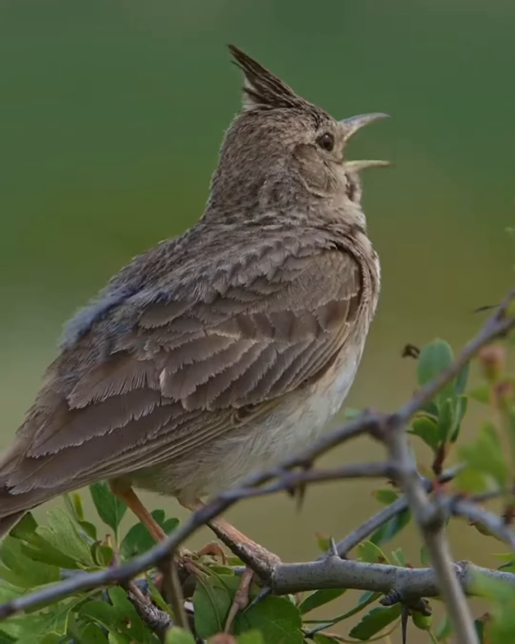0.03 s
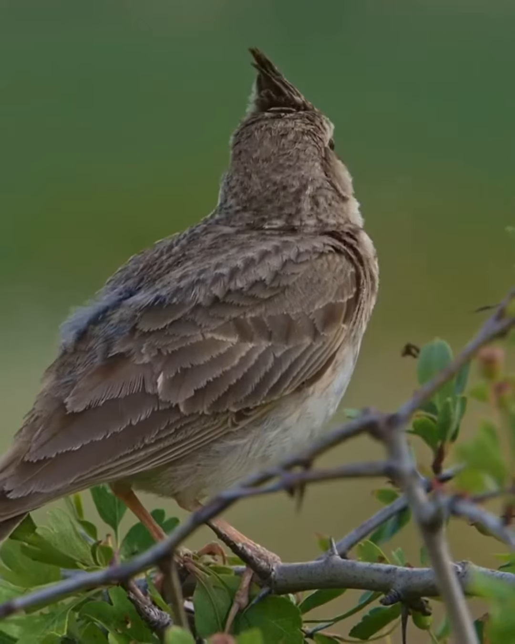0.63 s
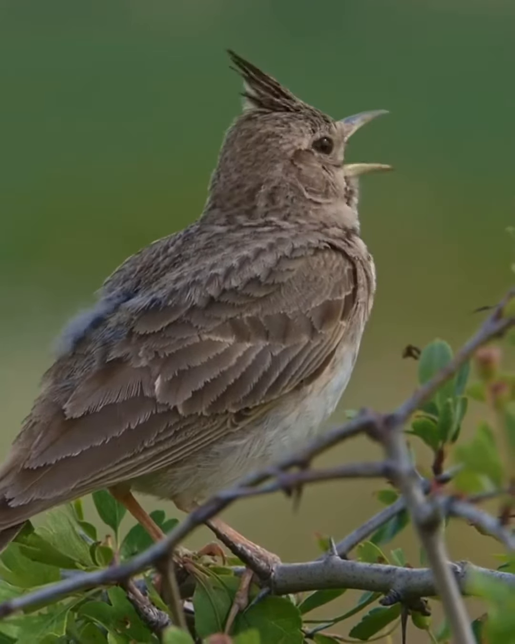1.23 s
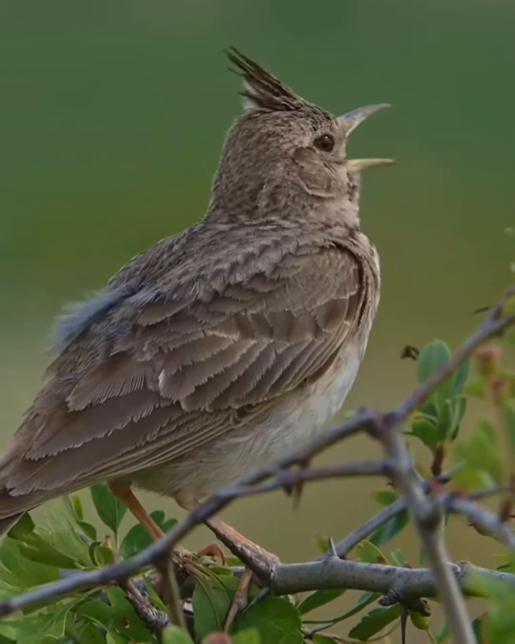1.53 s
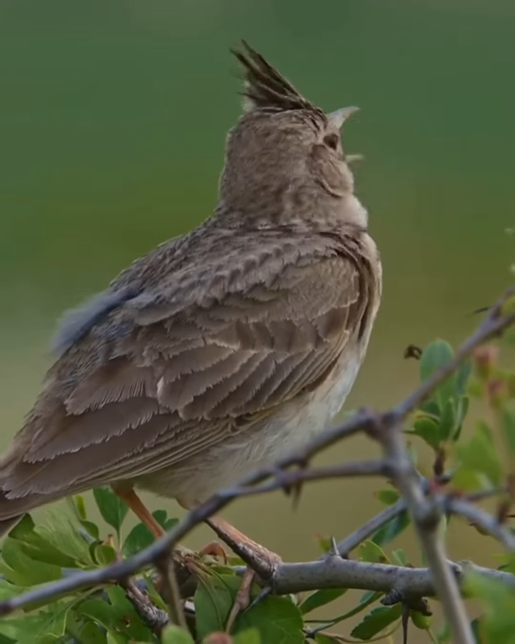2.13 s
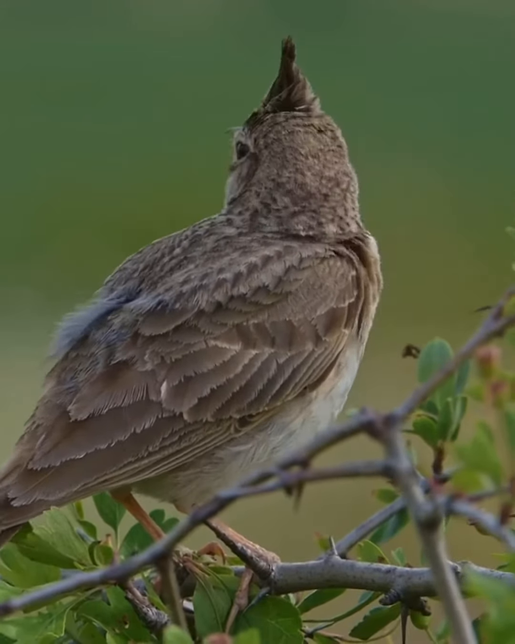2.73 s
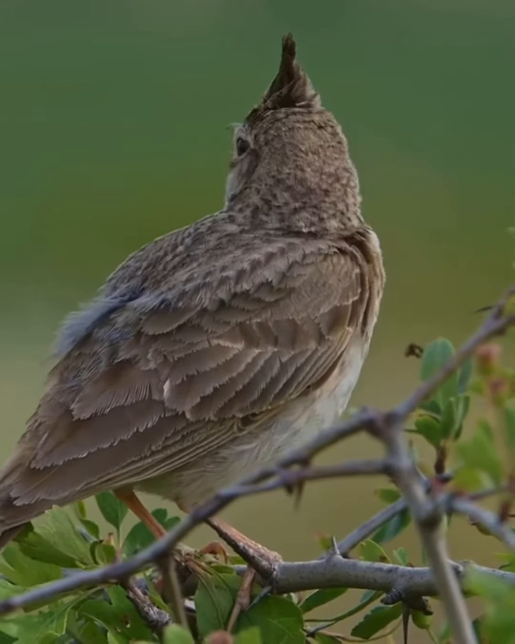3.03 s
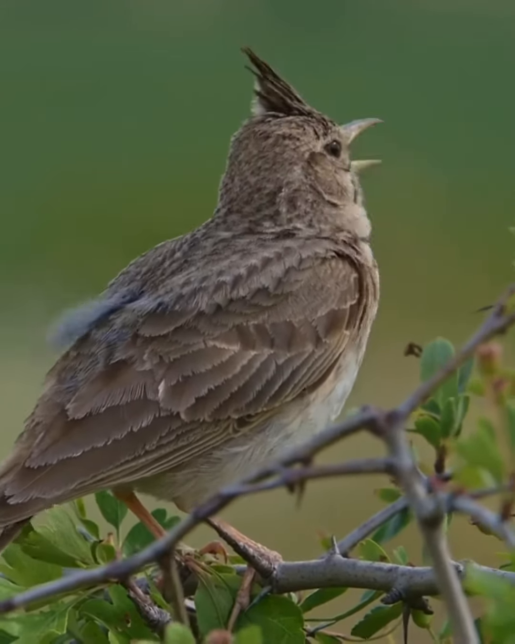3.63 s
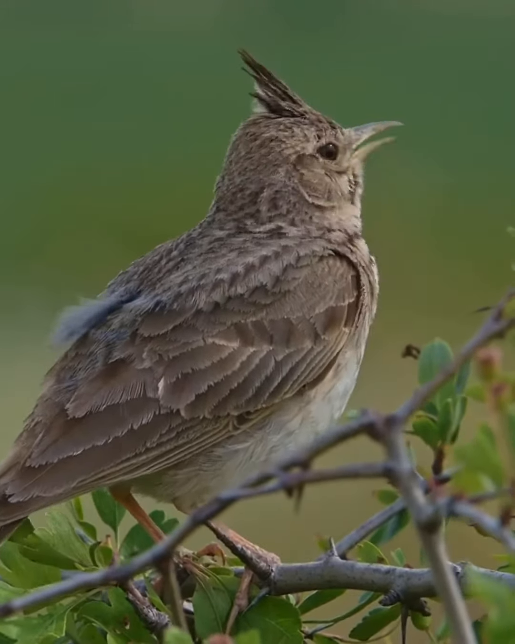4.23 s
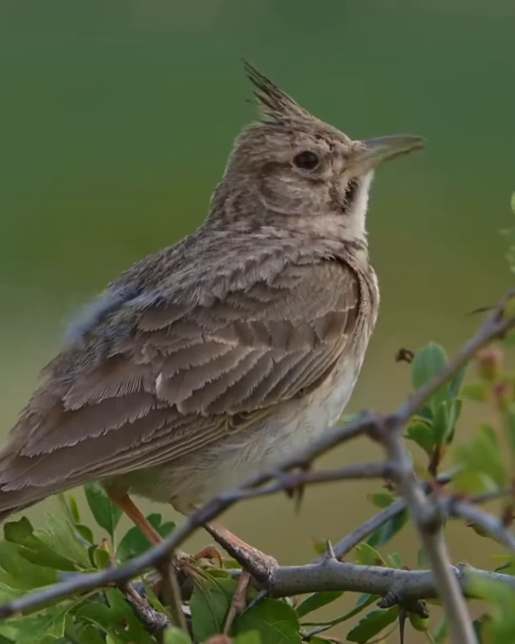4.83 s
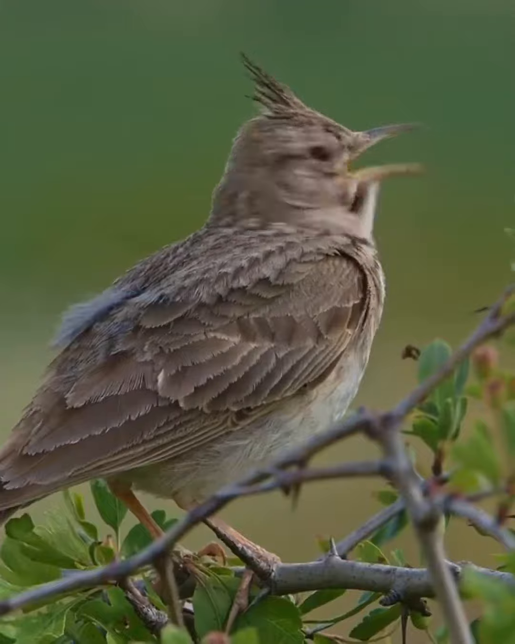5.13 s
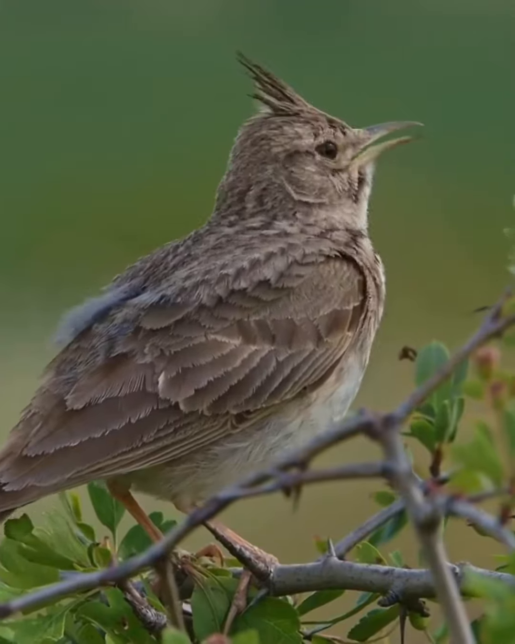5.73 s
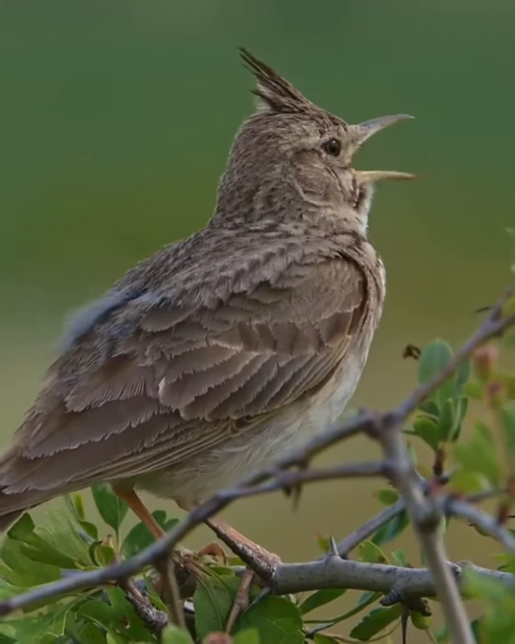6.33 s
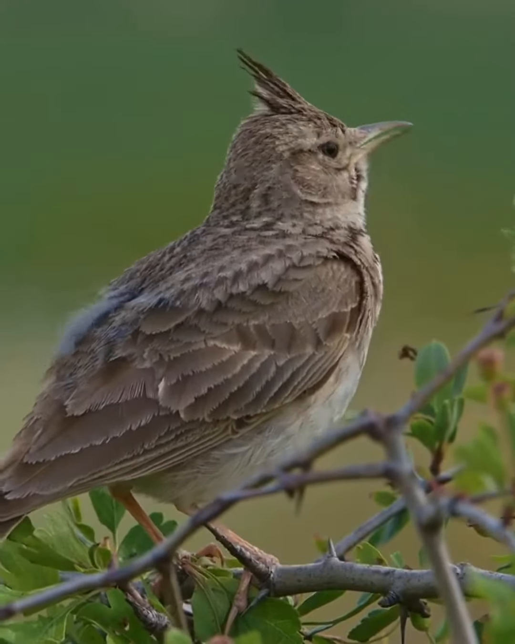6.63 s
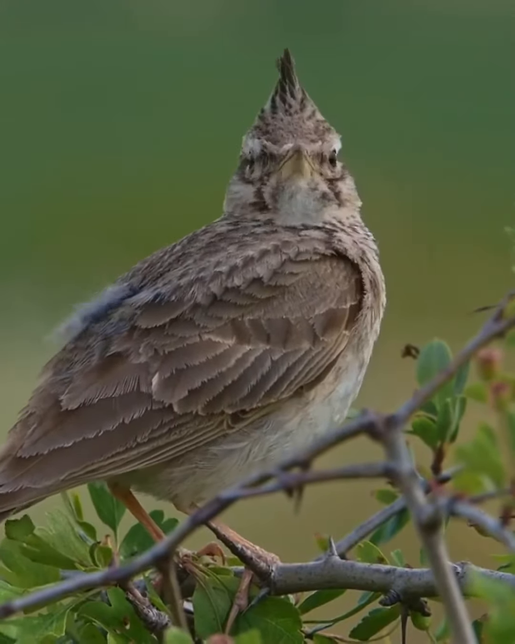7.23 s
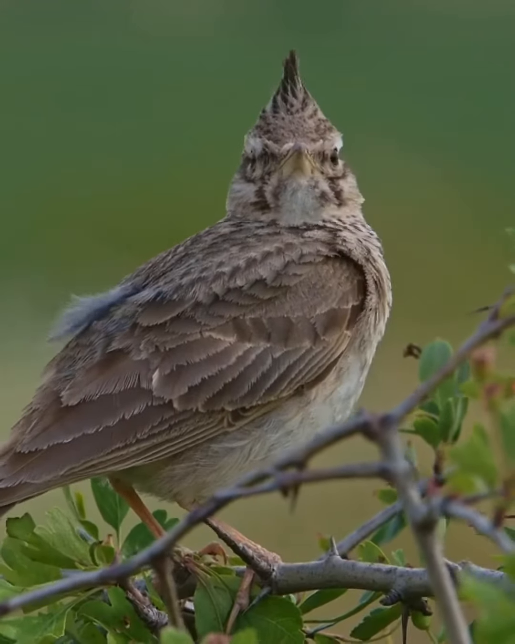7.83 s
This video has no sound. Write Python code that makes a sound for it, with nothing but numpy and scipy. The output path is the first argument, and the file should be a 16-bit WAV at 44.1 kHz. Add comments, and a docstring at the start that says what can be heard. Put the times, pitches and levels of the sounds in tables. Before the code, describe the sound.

In quiet open country, a small bird close to the microphone pours out bursts of bright, fast twittering, with swooping whistles, flutters and brief raspy notes. A fainter bird buzzes and trills in the gaps. After about seven seconds the near song ends, leaving the far bird's four descending slurs and a few tiny pips. The bushes add only a very short echo over a faint hush.

```python
"""A crested lark sings from a thorn bush in open scrub, close to a stereo microphone.
Its syrinx whistles fast slurs and zigzags, flutters into purrs and slaps shut in nasal notes
and dry rasps; air hisses through the beak. Twigs and bushes scatter the song into a short tail.
Farther off another bird answers with soft falling trills and pips; the air is almost still."""
import sys
import numpy as np
from scipy import signal
from scipy.fft import rfft, irfft
from scipy.io import wavfile
from scipy.ndimage import uniform_filter1d

SR = 44100
rng = np.random.default_rng(int(sys.argv[2]) if len(sys.argv) > 2 else 0)


def output_pcm(signal):
    """Save a mono or channel-first signal as 16-bit PCM at the path in sys.argv[1].

    Samples are clipped to [-1, 1] before scaling.
    """
    pcm = np.clip(np.atleast_2d(signal).T, -1, 1) * 32767
    wavfile.write(sys.argv[1], SR, np.round(pcm).astype(np.int16))


N = 356769


def from_db(db):
    return 10 ** (np.asarray(db) / 20)


def unit_rms(x):
    return x / np.sqrt(np.mean(x ** 2) + 1e-20)


def at_hz(points, hz):
    """Read a curve of (frequency, value) points along a log frequency axis."""
    known_hz, values = np.transpose(points)
    return np.interp(np.log(hz + 1e-9), np.log(known_hz), values)


def wander(size, per_s):
    """Smooth random motion of rms 1, with changes up to about per_s times a second."""
    lowpass = signal.butter(3, per_s, fs=SR, output="sos")
    return unit_rms(signal.sosfilt(lowpass, rng.standard_normal(size + 4000))[4000:])


def coloured_noise(spectrum):
    """Noise of rms 1 with the given spectral shape."""
    gains = from_db(at_hz(spectrum, np.fft.rfftfreq(N, 1 / SR)))
    return unit_rms(irfft(rfft(rng.standard_normal(N)) * gains, N))


def add(out, start_s, sound):
    """Mix a stereo sound in at its time."""
    first = max(round(start_s * SR), 0)
    part = sound[:, :max(N - first, 0)]
    out[:, first:first + part.shape[1]] += part


def fade(size, edge_s):
    """The bird's air valve opens and closes softly."""
    t = np.arange(size) / SR
    return np.sin(np.pi / 2 * np.clip(np.minimum(t, t[::-1]) / edge_s, 0, 1)) ** 2


def gesture(rows, glide_s=.0025, edge_s=.006):
    """Start, pitch and amplitude of a syllable; muscle inertia rounds the corners."""
    times, hz, db = np.transpose(sorted(map(tuple, rows)))
    t = np.arange(times[0] - edge_s / 2, times[-1] + edge_s / 2, 1 / SR)
    width = max(int(glide_s * SR), 3)
    inertia = signal.windows.hann(width)

    def rounded(values):
        padded = np.pad(np.interp(t, times, values), width, "edge")
        return signal.convolve(padded, inertia / inertia.sum(), "same")[width:-width]

    return t[0], rounded(hz), from_db(rounded(db)) * fade(len(t), edge_s)


# Where each pitch sits at the microphone: (frequency [Hz], left minus right [dB])
BALANCE = [(1300, 4.5), (2000, 2), (2550, -1.5), (2850, -6), (3100, -1.5), (3400, -5.5), (3680, 0),
           (3920, -4), (4130, 6.5), (4260, 3), (4400, 1), (4650, -2.5), (5200, -1.5), (5900, 3), (7000, 0),
           (10400, 10), (12500, -1.5), (14000, -7.5)]


def stereo_gains(hz):
    """Left and right gain at each frequency."""
    lean_db = at_hz(BALANCE, hz) / 2
    return from_db([lean_db, -lean_db])


def partial(hz, right_leads_s=1.3e-5):
    """A stereo sine that follows a pitch curve."""
    cycles = np.cumsum(hz) / SR + np.outer([0, right_leads_s], hz)
    return np.sqrt(2) * np.sin(2 * np.pi * cycles) * (hz < SR / 2) * stereo_gains(hz)


SLUR_GAP_S, LEAP_HZ = .0055, 450   # a longer gap or a wider step breaks the whistle


def note(start, length, first_hz, middle_hz, last_hz, db, growth_db, flicks_per_s=0, flick_hz=0):
    """One parabolic bend of pitch, with any upward flicks: (time [s], pitch [Hz], level [dB])."""
    t = np.arange(0, length, .0005)
    progress = t / length
    bend = np.polyval(np.polyfit([0, .5, 1], [first_hz, middle_hz, last_hz], 2), progress)
    flicks = flick_hz * (1 - abs(np.sin(np.pi * flicks_per_s * t)))
    return np.column_stack([start + t, bend + flicks, db + growth_db * (progress - .5)])


def slurred(rows, before, ease_s=.003):
    """A note eases out of the one it touches; after a pause or a leap it starts afresh."""
    gap_s, step_hz, step_db = rows[0] - before[-1]
    if gap_s > SLUR_GAP_S or abs(step_hz) > LEAP_HZ:
        return rows
    return rows - np.outer(np.exp(-(rows[:, 0] - rows[0, 0]) / ease_s), [0, step_hz, step_db])


# How strongly the whistle carries to the microphone: (pitch [Hz], gain [dB])
CARRY = [(1600, -20.5), (2300, -12), (2800, -8.5), (3080, 0), (3280, -11), (3600, -1.5), (3900, 0),
         (4100, -3), (4350, 0), (4650, 1.5), (5200, -5), (5500, -6.5), (5750, -5.5), (6200, -12.5)]


def voiced(rows, attack_db=11.5, attack_s=.005, release_db=5, release_s=.0019):
    """A run of notes swells in, sinks out and breaks into syllables at wide leaps."""
    times, hz, db = rows.T
    attack = attack_db * np.exp((times[0] - times) / attack_s)
    release = release_db * np.exp((times - times[-1]) / release_s)
    shaped = np.column_stack([times, hz, db + at_hz(CARRY, hz) - attack - release])
    return np.split(shaped, np.flatnonzero(abs(np.diff(hz)) > LEAP_HZ) + 1)


# The lark's five figures, each sung twice: (time in the figure [s], length [s],
# first pitch [Hz], middle pitch [Hz], last pitch [Hz], level [dB], growth [dB])
SWOOP = [(0, 0.019, 6350, 5325, 4062, -18.5, 2), (0.021, 0.04, 5193, 3935, 2788, -19, -10),
         (0.066, 0.031, 3890, 3460, 4850, -28.5, 0), (0.099, 0.021, 3050, 4095, 5520, -23, -2.5),
         (0.141, 0.049, 5850, 6120, 5250, -19, 8.5), (0.19, 0.03, 5240, 4160, 3553, -23.5, -9)]   # two dives, two upward flicks, a long high fall
STAIRS = [(0.0, 0.019, 6730, 5554, 5820, -15, -3.5), (0.021, 0.026, 5670, 4960, 5335, -19.5, -4.5),
          (0.047, 0.024, 5310, 4350, 4260, -19.5, -4.5), (0.071, 0.023, 4360, 3555, 3560, -23, -7.5)]   # four dips, each lower than the last
HOOK = [(0, .016, 2986, 4600, 2999, -16, -1), (.018, .038, 4930, 4055, 4460, -18.5, -1.5)]   # a peak and a scoop
ARCHES = [(0.0, 0.042, 3567, 4486, 3570, -20, 7.5), (0.042, 0.055, 3516, 3953, 3296, -20.5, -1.5)]   # a high arch and a lower one
TUMBLE = [(0.0, 0.04, 3330, 3864, 3178, -18.5, 0), (0.04, 0.02, 3384, 3180, 3136, -18.5, 3),
          (0.06, 0.031, 3170, 3450, 3110, -19.5, 1), (0.091, 0.03, 3095, 2130, 1600, -27.5, -12.5)]   # two arches, then a plunge
# When they are sung: (figure, time [s], stretch [ratio], pitch [ratio], gain [dB])
FIGURES = [(SWOOP, 1.146, 1, 0.99, 0), (STAIRS, 1.503, 1, 0.98, 0), (HOOK, 1.603, 0.9, 0.98, 0),
           (ARCHES, 2.57, 1, 1, 0), (TUMBLE, 2.815, 1, 1, 0), (STAIRS, 4.031, 1, 0.92, -5),
           (HOOK, 4.137, 0.88, .94, -1.2), (SWOOP, 5.11, 0.98, 1.002, 2), (ARCHES, 6.801, 1, .99, 3.3),
           (TUMBLE, 7.01, 0.94, 0.97, 2.46)]
# Free notes between the figures:
# (time [s], length [s], first pitch [Hz], middle pitch [Hz], last pitch [Hz], level [dB], growth [dB])
GLIDES = [(0.002, 0.077, 3630, 3925, 4150, -18.5, -14.5), (0.075, 0.058, 4130, 4266, 4150, -18, 10),
          (0.138, 0.018, 4270, 3490, 3130, -17, -3.5), (0.312, 0.052, 4340, 3810, 3506, -20, 14),
          (0.563, 0.077, 4330, 3965, 3210, -16, -1.5), (1.774, 0.019, 2710, 5280, 3940, -23, 9),
          (1.793, 0.016, 3934, 3507, 4930, -18.5, 1.5), (1.809, 0.0081, 4750, 3360, 2400, -21, -12),
          (1.82, 0.03, 3153, 3497, 2826, -15, -2), (1.898, 0.031, 3430, 5009, 5090, -26, -1),
          (1.968, 0.077, 4110, 4687, 4280, -15.5, 8), (2.05, 0.052, 4260, 3892, 3537, -19.5, -2),
          (2.152, 0.01, 2953, 4980, 5390, -21.5, -3.5), (3.066, 0.044, 4000, 5020, 3800, -21, 12),
          (3.172, 0.051, 3700, 3720, 3160, -14.5, -1), (3.285, 0.013, 3200, 4370, 5150, -16.5, 0.5),
          (3.297, 0.031, 5270, 4980, 3850, -20.0, 10), (3.327, 0.049, 3860, 4357, 3970, -14.5, 1.5),
          (3.375, 0.052, 3930, 3868, 4150, -15, -7.5), (3.43, 0.036, 4222, 3224, 2860, -14.5, -3.5),
          (3.531, 0.0091, 3154, 4010, 4514, -15.5, 4), (3.54, 0.045, 4420, 4387, 3270, -15.6, -1),
          (3.589, 0.011, 3005, 4640, 5070, -22.5, -10), (3.604, 0.033, 5523, 4780, 3696, -18.5, 8),
          (3.637, 0.049, 3820, 3513, 2620, -15.5, -2.5), (4.466, 0.0062, 3580, 4530, 5030, -31, -3.5),
          (4.497, 0.0079, 4460, 4520, 4680, -25, 0), (4.508, 0.0098, 4650, 3120, 2360, -15.5, -4.5),
          (4.716, 0.02, 3710, 4797, 5308, -23, 2.5), (5.945, 0.046, 3682, 3713, 3940, -15, 6),
          (6.109, 0.018, 4064, 3730, 3544, -15.5, -0.5), (6.128, 0.018, 4002, 3985, 3830, -16.5, 1.5),
          (6.149, 0.086, 4403, 4263, 4050, -14.5, -6), (6.294, 0.021, 3700, 3860, 4990, -23.5, 8.5),
          (6.315, 0.03, 4730, 5055, 5350, -20, 9.5), (6.411, 0.044, 3256, 3533, 3632, -15.5, -1)]
# Notes that keep flicking upward: (the columns of GLIDES, flick rate [1/s], flick height [Hz])
ZIGZAGS = [(0.368, 0.11, 3463, 3360, 3620, -16, 0, 27.3, 326),
           (0.478, 0.087, 3870, 4184, 4250, -18.5, 6.5, 22, 273),
           (1.848, 0.025, 2470, 3200, 2660, -28.5, -3, 152, 550),
           (1.935, 0.018, 4970, 4370, 4240, -20.5, -15, 85, 1130),
           (2.098, 0.035, 3234, 3143, 2980, -19, -2, 72.2, 800),
           (2.166, 0.029, 4410, 3490, 2990, -18.5, -7.5, 74, 1280),
           (2.245, 0.057, 1861, 2095, 2450, -21, 15, 70, 475.5),
           (2.304, 0.054, 2510, 2245, 2220, -18.5, -10, 71, 430),
           (3.115, 0.06, 3960, 2916, 3200, -22.5, -9.5, 73, 336.8),
           (4.473, 0.025, 4730, 4154, 4600, -23, 4, 70.7, 1070),
           (4.653, 0.026, 4715, 4681, 3380, -30.5, -5.5, 72, 680),
           (4.737, 0.027, 4606, 3490, 2290, -21, -4, 85.0, 1160),
           (5.788, 0.047, 2880, 3430, 3200, -19, 1, 62, 1100),
           (5.838, 0.038, 2880, 3497, 4420, -24.5, -3, 52.7, 1590),
           (5.88, 0.06, 4820, 4390, 3270, -17.5, 2, 35.8, 680),
           (6.345, 0.061, 4484, 4212, 3040, -17.0, -5.5, 35.5, 310)]


def lark_syllables():
    """The whistled notes in order, each cut off by the next and slurred to it where they touch."""
    notes = [note(*row) for row in [*GLIDES, *ZIGZAGS]]
    for figure, start, stretch, ratio, db in FIGURES:
        notes += [note(*row) * [stretch, ratio, 1] + [start, 0, db] for row in figure]
    notes.sort(key=lambda rows: rows[0, 0])
    notes = [rows[rows[:, 0] < after[0, 0]] for rows, after in zip(notes, notes[1:])] + notes[-1:]
    song = np.vstack(notes[:1] + [slurred(rows, before) for before, rows in zip(notes, notes[1:])])
    runs = np.split(song, np.flatnonzero(np.diff(song[:, 0]) > SLUR_GAP_S) + 1)
    return [syllable for run in runs for syllable in voiced(run)]


def lark_whistles(second_db=-41, third_db=-47.5, octave_below_db=-15, shimmer_db=5, grit=.14):
    """The syrinx gives a near sine, pure when held and gritty in fast sweeps, with faint overtones."""
    tone, overtones = np.zeros((2, 2, N))
    for syllable in lark_syllables():
        start, pitch, loud = gesture(syllable)
        size = len(pitch)
        sweep_rate = abs(np.gradient(np.log(pitch))) * SR
        strain = uniform_filter1d(np.tanh(sweep_rate / 30) ** 2, size=200)
        quiver = .006 * wander(size, 55)
        jitter = .028 * strain * wander(size, 380)
        pitch = pitch * (1 + quiver + jitter)
        loud *= from_db(shimmer_db * strain * wander(size, 100))
        loud *= 1 + grit * strain * wander(size, 600)
        add(tone, start, loud * partial(pitch))
        # on the highest notes the membrane's period doubles
        doubling = np.clip((pitch - 5600) / 400, 0, 1)
        add(tone, start, loud * doubling * from_db(octave_below_db) * partial(pitch / 2))
        for order, db in ((2, second_db), (3, third_db)):
            flicker = from_db(4.5 * wander(size, 70))
            add(overtones, start, loud * flicker * from_db(db) * partial(order * pitch))
    return tone, overtones


def throat(voice, band_hz=(1510, 6600)):
    """The throat cavity passes the whistle's range and little else."""
    return signal.sosfilt(signal.butter(5, band_hz, "band", fs=SR, output="sos"), voice)


# Turbulence in the beak, heard at close range: (frequency [Hz], relative density [dB])
HISS_SPECTRUM = [(1300, -36.5), (2000, -24.5), (5500, -4.5), (7200, -10), (8800, -1.5), (10500, 1.5),
                 (12500, -7.5), (15000, -2.5)]


def beak_hiss(voice, gain_db=-50.5, growth=.52, held_share=.35):
    """Air hisses through the beak with the strength of the song, most where its level changes fast."""
    power = np.maximum(uniform_filter1d(voice[0] ** 2, size=200), 0) + 1e-12
    change = abs(np.log(power / np.roll(power, 130)))   # over 3 ms
    churn = uniform_filter1d(np.tanh(change), size=500)
    noise = irfft(rfft(coloured_noise(HISS_SPECTRUM)) * stereo_gains(np.fft.rfftfreq(N, 1 / SR)), N)
    return from_db(gain_db) * power ** (growth / 2) * (held_share + churn) * noise


# How openly the beak points at the microphone: (time [s], treble gain [dB])
BEAK_AIM = [(0, -2), (0.501, -2.5), (1.2, 4.5), (2.052, -1.5), (2.7, -12), (3.198, 4), (3.65, -6),
            (4.2, -6.5), (4.7, -2), (5.201, 6.5), (5.649, 0.5), (5.901, -6), (6.35, 1.5), (6.849, -6),
            (7.101, -13)]


def beak_beam(treble):
    """The treble comes and goes as the beak turns toward the microphone and away."""
    return treble * from_db(np.interp(np.arange(N) / SR, *np.transpose(BEAK_AIM)))


def scrub_echo(sound, twigs_db, bushes_db, field_db):
    """Sound scatters at once from the twigs, then from bushes, last and faintest from the open field."""
    t = np.arange(int(.7 * SR)) / SR
    response = 0
    for db, delay_s, t60_s in ((twigs_db, .001, .03), (bushes_db, .006, .13), (field_db, .03, .31)):
        decay = from_db(-60 * t / t60_s) * (t > delay_s)
        scatter = unit_rms(rng.standard_normal(len(t)) + .9 * rng.standard_normal((2, len(t))))
        response = response + from_db(db) * scatter * decay / np.linalg.norm(decay)
    return signal.fftconvolve(sound, response, axes=1)[:, :N]


# Still air over the scrub: (frequency [Hz], relative density [dB])
AIR_SPECTRUM = [(40, -20), (1000, -30.5), (1800, -24), (2500, -7), (3600, -10), (4600, -9), (5800, -20.5),
                (15000, -44)]


def still_air(gain_db=-77, spread=.6):
    """A faint hush all around the microphone, partly different on each side."""
    common, left, right = (coloured_noise(AIR_SPECTRUM) for _ in range(3))
    return from_db(gain_db) * (common + spread * np.array([left, right]))


def flutter(pitch, per_s, swing_hz, pulsing):
    """A quick tremor swings the pitch and chops the tone into sliding pulses."""
    size = len(pitch)
    phase = 2 * np.pi * np.cumsum(per_s * (1 + .04 * wander(size, 20))) / SR
    chop = 1 - np.clip(pulsing, 0, 1) * (1 - np.sin(phase / 2) ** 4)
    shimmer = from_db(1.7 * wander(size, 60))
    shaky_pitch = pitch * (1 + .016 * wander(size, 210))
    return chop * shimmer * partial(shaky_pitch + swing_hz * np.sin(phase))


def trills(rows, settle=1.4, swell=.15):
    """Fluttering notes that swell and glide, fast at first, then levelling off."""
    out = np.zeros((2, N))
    for start, length, first_hz, last_hz, db, per_s, swing_hz, pulsing in rows:
        remaining = np.linspace(1, 0, int(length * SR))
        size = len(remaining)
        pitch = last_hz + (first_hz - last_hz) * remaining ** settle
        envelope = abs(np.sin(np.pi * remaining)) ** swell * fade(size, .0009)
        loud = from_db(db + 1.8 * wander(size, 21)) * envelope
        add(out, start, loud * flutter(pitch, per_s, swing_hz, pulsing))
    return out


# The far bird's buzzes: (time [s], length [s], first pitch [Hz], last pitch [Hz], level [dB],
# flutter rate [1/s], pitch swing [Hz], pulsing [0-1])
FAR_BUZZES = [(.175, 0.067, 3700, 2665, -43.5, 63, 150, 0.82),
              (.68, 0.095, 3600, 2086, -52.5, 69.7, 150, .94), (.79, 0.23, 2100, 2022, -67, 70, 60, 0.99),
              (.93, 0.16, 3850, 3800, -54, 39.5, 60, 0.88), (1.11, 0.059, 3400, 4340, -47.5, 61, 60, 0),
              (1.375, 0.095, 4200, 2836, -39.5, 61.2, 250, 1),
              (1.66, 0.056, 4460, 4910, -44, 102.6, 300, 0.9),
              (1.9, .25, 2400, 2120, -57.5, 75.6, 100, 0.58),
              (2.445, .065, 3500, 3450, -44, 110.5, 300, 0.97),
              (2.83, 0.22, 5050, 4620, -55.5, 87.4, 150, 0.76), (5.69, .27, 3886, 3850, -54.5, 90, 81, 0.6),
              (6.93, 0.12, 4350, 4173, -44, 90, 350, 1)]
# Its short high pips: (time [s], pitch [Hz], level [dB])
FAR_PIPS = [(2.412, 5110, -52.5), (2.761, 5490, -52), (2.781, 4730, -48), (6.714, 4430, -67),
            (6.75, 4750, -55.5), (6.783, 4900, -45.5), (8.015, 4600, -44), (8.048, 4700, -42),
            (8.08, 4950, -41.5)]
# Its long wavering falls: (time [s], length [s], level [dB])
FAR_FALLS = [(3.2, 0.26, -58.5), (3.6, 0.29, -59.5), (4.008, .3, -50), (4.42, .31, -50),
             (4.845, .321, -53.5), (5.21, 0.29, -54)]


def far_calls(fall_hz=(3430, 2310), wavers_per_s=37, swing_hz=135, pulsing=.2, pip_s=.016, sag_hz=228):
    """A second bird, well off in the scrub: buzzes, pips that sag a little and wavering falls."""
    falls = [(s, length, *fall_hz, db, wavers_per_s, swing_hz, pulsing) for s, length, db in FAR_FALLS]
    pips = [(s, pip_s, hz, hz - sag_hz, db, 0, 0, 0) for s, hz, db in FAR_PIPS]
    return trills(falls) + trills(pips) + trills(FAR_BUZZES)


# The other side of the lark's syrinx, one list per syllable: (time [s], pitch [Hz], level [dB])
SECOND_VOICE = [
    [(.375, 4250, -45.5), (.43, 4590, -51), (.475, 4590, -46)],
    [(1.203, 2740, -41.5), (1.228, 1720, -68), (1.246, 2700, -49)],
    [(2.286, 3500, -45.5), (2.357, 3500, -48.5)],
    [(4.605, 3408, -40.5), (4.63, 4630, -42.5), (4.646, 5870, -42.5)],
    [(5.165, 3100, -38), (5.187, 2000, -57.5), (5.208, 2912, -44.5)],
    [(6.26, 3100, -48), (6.33, 3430, -47.5), (6.4, 3010, -53.5)],
]


def lark_second_voice(jitter=.091, shimmer_db=4):
    """The second membrane is barely driven and vibrates unsteadily."""
    out = np.zeros((2, N))
    for syllable in SECOND_VOICE:
        start, pitch, loud = gesture(syllable)
        loud *= from_db(shimmer_db * wander(len(pitch), 270))
        pitch *= 1 + jitter * wander(len(pitch), 300)
        add(out, start, loud * partial(pitch))
    return out


def reedy_tone(pitch, throat_colour, roughness):
    """The membranes slap shut unevenly: a stack of flickering harmonics shaped by the throat."""
    size = len(pitch)
    pitch = pitch * (1 + .07 * roughness * wander(size, 500))
    harmonics_hz = np.arange(1, 17)[:, None] * pitch
    gains = from_db(at_hz(throat_colour, harmonics_hz))
    gains /= np.linalg.norm(gains, axis=0)
    return sum(gain * (1 + roughness * wander(size, 210)) * partial(hz)
               for gain, hz in zip(gains, harmonics_hz))


# Nasal notes from the thorn bush, one list per syllable: (time [s], pulse rate [Hz], level [dB])
NASAL_NOTES = [
    [(1.849, 1127, -38), (1.859, 1250, -41.5), (1.868, 839, -29.5), (1.892, 634, -44)],
    [(2.36, 1670, -32), (2.368, 1420, -33.5), (2.376, 820, -45.5), (2.394, 752, -53)],
    [(4.519, 884, -40.5), (4.531, 795, -34.5), (4.551, 1151, -29.5), (4.562, 970, -37.5),
     (4.576, 763, -27.5), (4.59, 647, -40.5), (4.615, 578, -43)],
    [(4.874, 858, -52.5), (4.887, 965, -31.5), (4.901, 1104, -29), (4.912, 998, -19.5), (4.924, 886, -35.5),
     (4.944, 790, -32.5), (4.962, 724, -24), (4.973, 676, -42), (4.99, 666, -35.5), (5.025, 556, -51.5)],
]
# Their throat colour: (frequency [Hz], relative gain [dB])
NASAL_THROAT = [(800, -50.5), (1300, -22), (2100, -10.5), (3000, 8.5), (3700, -4.5), (4500, -18),
                (5600, -24.5), (7000, -59.5), (15000, -50)]


def lark_nasal_notes():
    """Reedy glides from membranes that slap shut almost evenly."""
    out = np.zeros((2, N))
    for syllable in NASAL_NOTES:
        start, pitch, loud = gesture(syllable)
        add(out, start, loud * reedy_tone(pitch, NASAL_THROAT, roughness=.15))
    return out


def rumble(db=-66, centre_s=3.22, width_s=.09):
    """One soft low rumble swells and fades."""
    swell = np.exp(-((np.arange(N) / SR - centre_s) / width_s) ** 2)
    spectrum = [(90, -27), (170, -.5), (260, -8), (480, -3), (650, -29.5), (3000, -60)]
    return from_db(db) * swell * coloured_noise(spectrum)


# Purrs at close range: (time [s], length [s], first pitch [Hz], last pitch [Hz], level [dB],
# flutter rate [1/s], pitch swing [Hz], pulsing [0-1])
PURRS = [(4.316, 0.049, 2850, 2667, -25, 82, -500, 0.83), (4.355, 0.034, 2740, 1640, -44.5, 74, -450, 0.69),
         (6.052, 0.037, 2844, 2966, -18.5, 174, 66.5, 0.66),
         (6.25, 0.019, 3485, 4010, -24, 170, 298.5, 0.7), (6.268, 0.03, 4180, 3930, -15.5, 110, 324, 0.51)]


def lark_purrs():
    """A fast tremor chops short whistles into purrs."""
    return trills(PURRS)


# Dry rasps at close range: (centre time [s], length [s], pulse rate [Hz], level [dB], roughness [0-1])
RASPS = [(4.329, 0.047, 998, -43.5, 0.6), (4.361, 0.032, 848, -50, 0.53), (5.562, 0.024, 968.4, -34, 0.47),
         (5.575, 0.016, 775, -28, 0.61), (5.59, 0.014, 775, -27, 0.2), (5.603, 0.01, 1054, -28.5, 0.37),
         (5.627, .018, 978, -28.5, 0.2), (5.642, 0.0089, 974, -26, 0.02), (5.654, 0.013, 890, -34, 0.4)]
# Their throat colour: (frequency [Hz], relative gain [dB])
RASP_THROAT = [(900, -79), (2000, -17.5), (3050, 8), (3900, 3), (4900, 0), (5900, -14), (7000, -58.5),
               (9000, -14), (15000, -24.5)]


def lark_rasps(sag=.082):
    """Short bursts of slapping membranes, each sagging in pitch."""
    out = np.zeros((2, N))
    for centre, length, hz, db, roughness in RASPS:
        progress = np.linspace(0, 1, int(length * SR))
        pitch = hz * (1 - sag * (progress - .5))
        burst = np.sin(np.pi * progress) * reedy_tone(pitch, RASP_THROAT, roughness)
        add(out, centre - length / 2, from_db(db) * burst)
    return out


# The far bird's closing slurs: (time [s], level [dB])
FAR_SLURS = [(7.184, -45), (7.382, -45.5), (7.584, -43.5), (7.789, -39.5)]
# The shape of each: (time in the slur [s], pitch [Hz], gain [dB])
SLUR_SHAPE = [(0, 3724, -5), (.012, 4350, -4.5), (.027, 3940, -2.5), (.04, 3244, -3.5), (.065, 3115, -1),
              (.095, 2600, -3), (.125, 2176, -14.5), (.155, 1990, -28)]


def far_slurs(per_s=72, swing_hz=167, onset_swing_hz=240, narrowing_s=.027):
    """A distant buzzy fall, its tremor widest at the start, sung four times, the last loudest."""
    out = np.zeros((2, N))
    _, pitch, loud = gesture(SLUR_SHAPE, glide_s=.014)
    swing = swing_hz + onset_swing_hz * np.exp(-np.arange(len(pitch)) / SR / narrowing_s)
    for start, db in FAR_SLURS:
        add(out, start, from_db(db) * loud * flutter(pitch, per_s, swing, pulsing=.98))
    return out


def scene():
    """At the microphone: the near lark, the far bird, their echoes off the scrub and the quiet air."""
    tone, overtones = lark_whistles()
    lark = throat(tone + lark_second_voice() + lark_nasal_notes() + lark_rasps() + lark_purrs())
    treble = beak_beam(overtones + beak_hiss(lark))
    far_bird = far_calls() + far_slurs()
    # the treble beams narrowly, so more of it arrives by scattering
    echoes = (scrub_echo(lark, twigs_db=-13, bushes_db=-13, field_db=-37)
              + scrub_echo(treble, twigs_db=-3.5, bushes_db=-6.5, field_db=-12.5)
              + scrub_echo(far_bird, twigs_db=-2.5, bushes_db=-10.5, field_db=-27))
    return lark + treble + far_bird + echoes + still_air() + rumble()


def record(dry, cutoff_hz=15700):
    """The top of the microphone signal is cut steeply."""
    return signal.sosfilt(signal.ellip(10, .1, 80, cutoff_hz, fs=SR, output="sos"), dry)


dry = scene()
out = record(dry)
output_pcm(out)
```